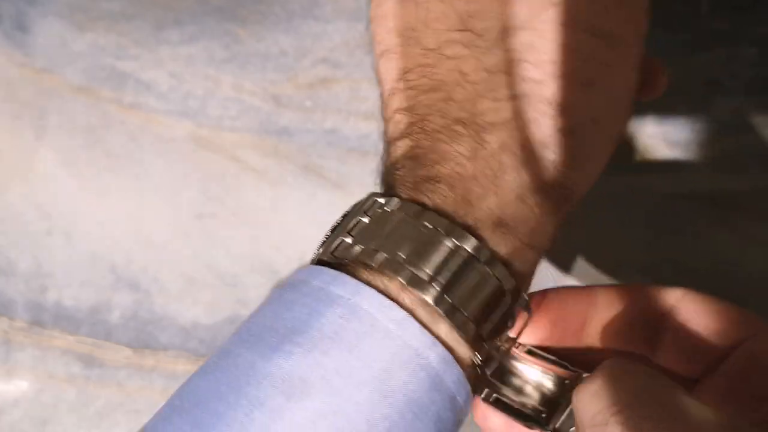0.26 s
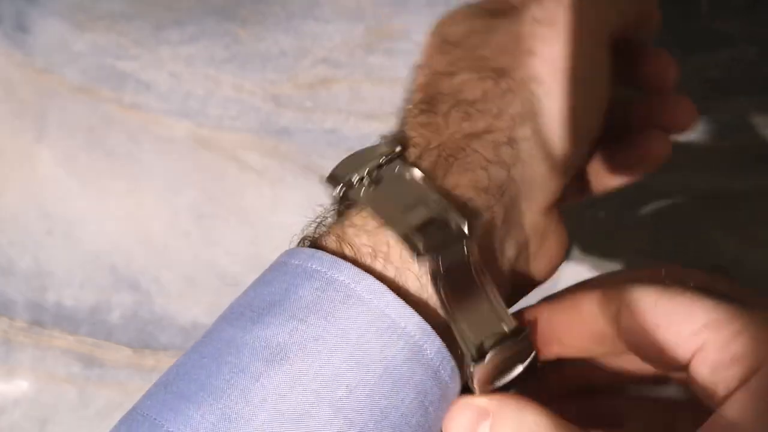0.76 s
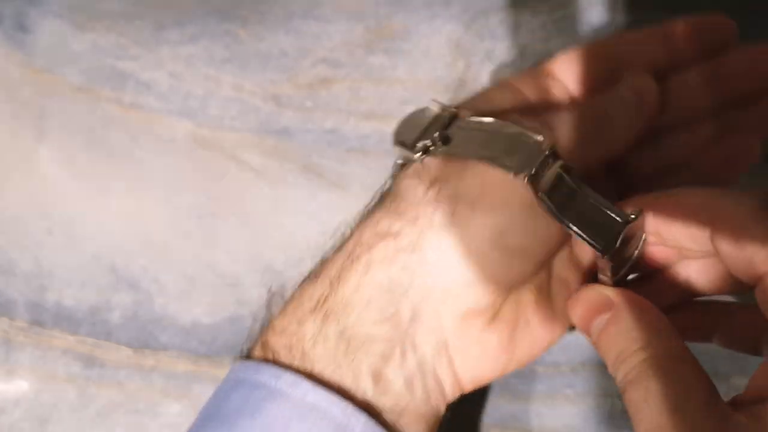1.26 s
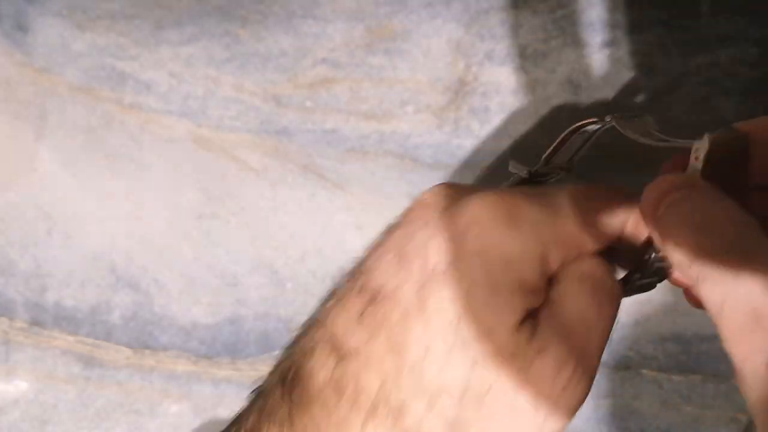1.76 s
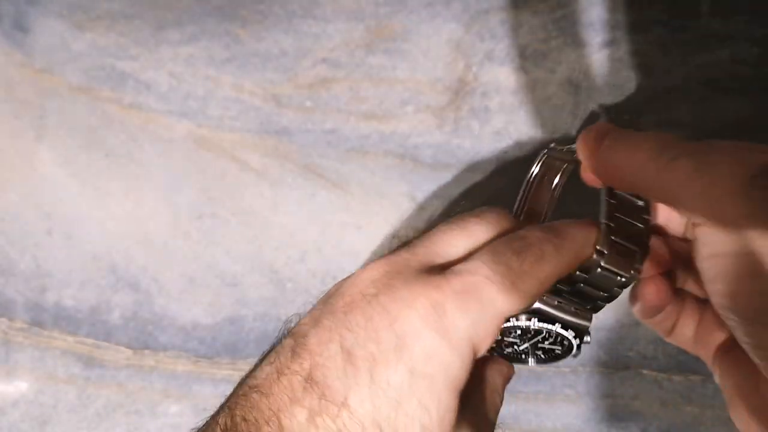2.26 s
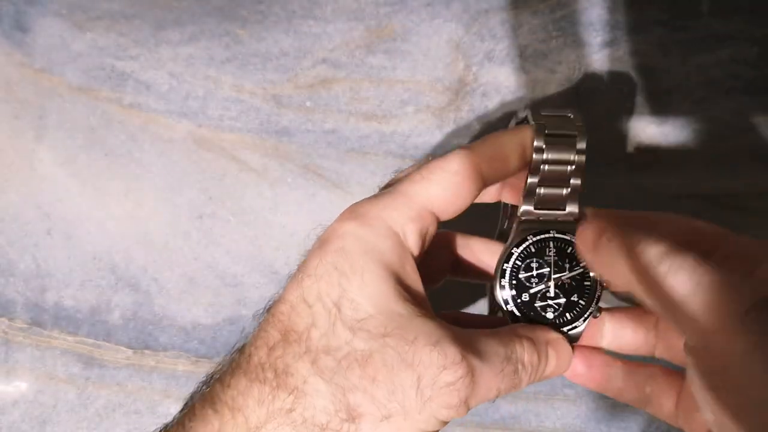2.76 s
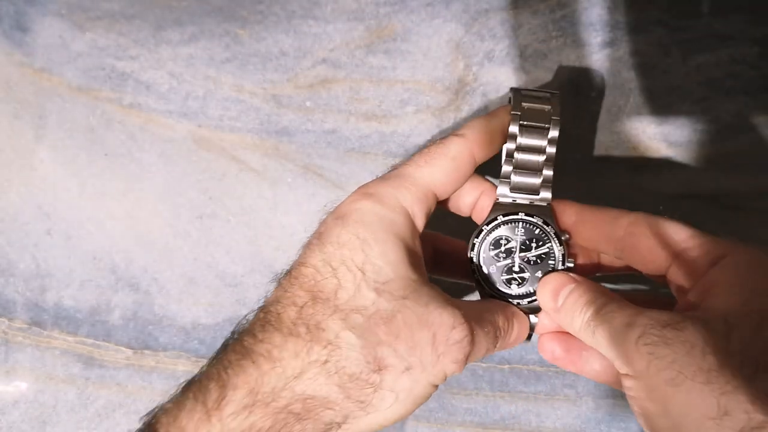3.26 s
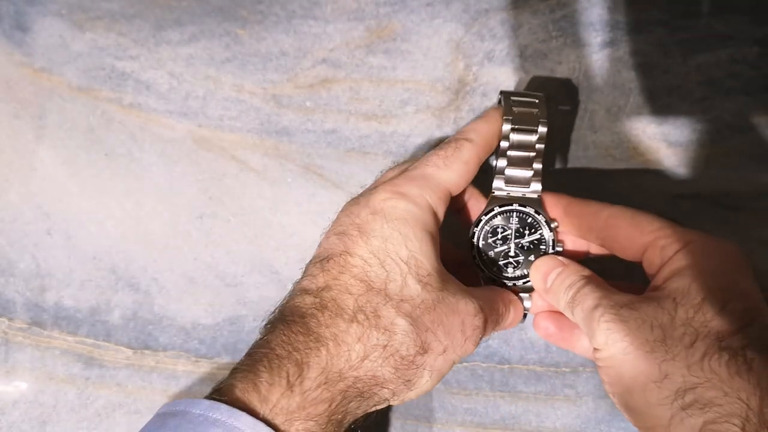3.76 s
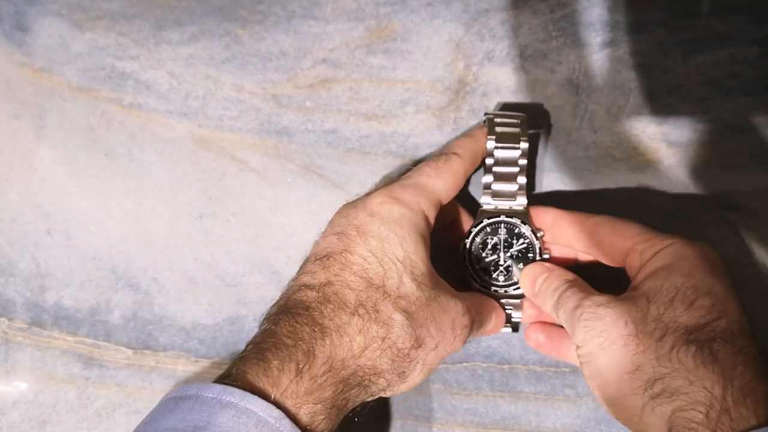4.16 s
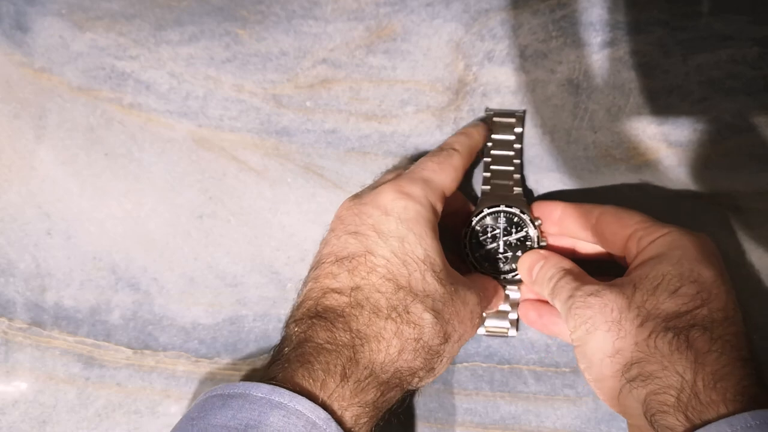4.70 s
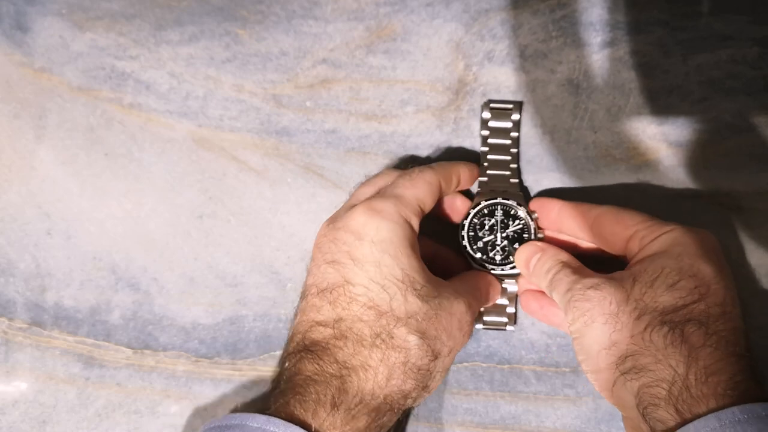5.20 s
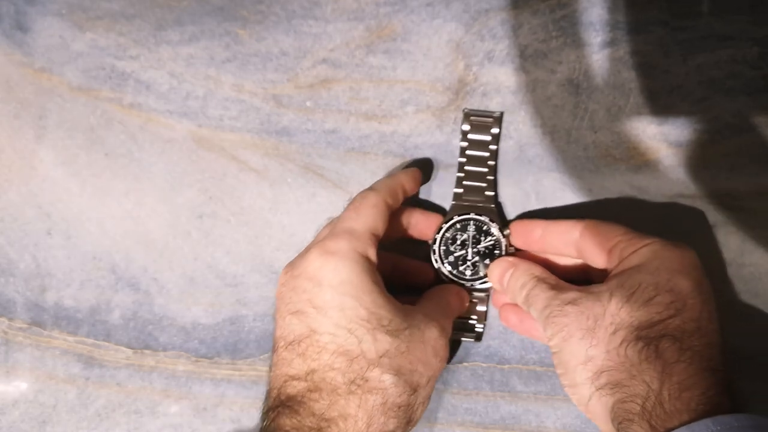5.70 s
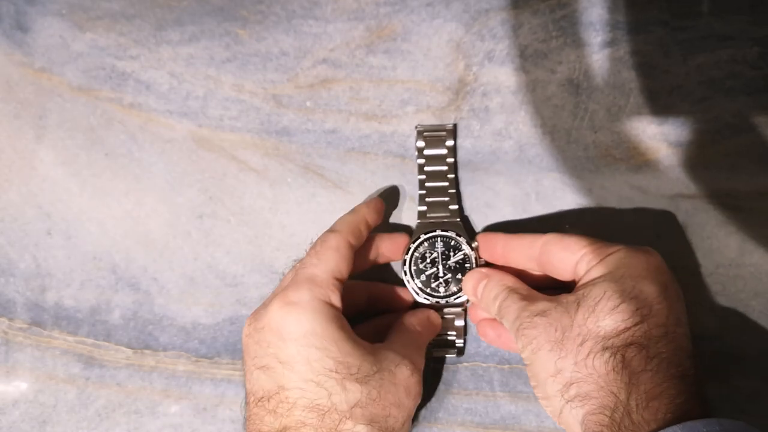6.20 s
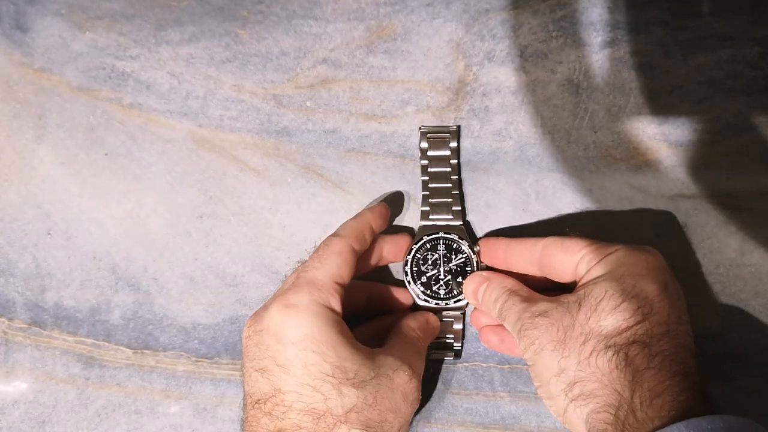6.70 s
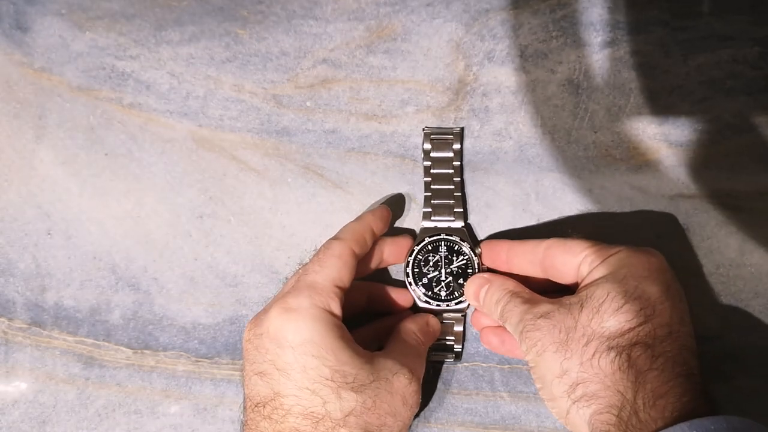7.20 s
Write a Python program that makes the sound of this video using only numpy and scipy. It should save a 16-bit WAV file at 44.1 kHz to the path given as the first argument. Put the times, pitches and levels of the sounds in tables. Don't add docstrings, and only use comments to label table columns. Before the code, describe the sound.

A steel watch bracelet snaps open with a bright click, jingles lightly in the hands, then clacks and scrapes down onto a table.

```python
import sys
import numpy as np
from scipy import signal
from scipy.fft import rfft, irfft
from scipy.io import wavfile
from scipy.ndimage import uniform_filter1d

SR = 44100
rng = np.random.default_rng(int(sys.argv[2]) if len(sys.argv) > 2 else 0)


def unload_wav(signal):
    wavfile.write(
        sys.argv[1],
        SR,
        np.round(np.clip(np.atleast_2d(signal).T, -1, 1) * 32767).astype(np.int16),
    )


def makeup_ratio(level_db):
    decades = np.asarray(level_db, float) / 20
    return 10 ** decades


N = 328545
DECAY = np.log(1000)
SET_DOWN_S = 4.35


def shaped(x, points, gain=makeup_ratio):
    hz, value = np.transpose(points)
    f = np.fft.rfftfreq(x.shape[-1], 1 / SR)
    curve = np.interp(np.log(f + 1), np.log(hz), value)
    return irfft(rfft(x) * gain(curve), x.shape[-1])


def unit(x):
    return x / np.sqrt(np.mean(x ** 2))


def peak(x, db):
    return x * makeup_ratio(db) / np.sqrt(np.max(uniform_filter1d(x ** 2, size=150)))


def add(out, s, sound):
    at = int(s * SR) - 32
    out[at:at + len(sound)] += sound[:N - at]


def ring(modes, scatter_db, size, retune=.015):
    hz, db, t60 = np.transpose(modes)[:, :, None]
    t = np.arange(size) / SR
    chance = rng.standard_normal((2, len(modes), 1))
    tones = np.sin(2 * np.pi * hz * (1 + retune * chance[0]) * t)
    waves = tones * np.exp(-DECAY * t / t60)
    return np.sum(makeup_ratio(db + scatter_db * chance[1]) * waves, axis=0)


def contacts(size, spread_db):
    strength = np.minimum(rng.exponential(size=size), 5)
    return rng.standard_normal(size) * makeup_ratio(spread_db * strength)


# pitch_hz, density_db (per Hz)
HUM_COLOUR = [(8.8, -28), (15, 2.5), (54, -6.5), (76, -12), (219, -26), (315, -24.5), (373, -25),
              (599, -20.5), (749, -26), (1640, -25), (3390, -29), (4230, -34), (5760, -37), (11900, -43.5),
              (15500, -90.5), (22000, -120)]
HUM_DB = -67.5
# pitch_hz, correlation
MIC_LIKENESS = [(60, 1), (130, 0.56), (290, -0.86), (640, -0.79), (1410, 0.2), (3100, -0.21), (6820, 0.6),
                (15000, -0.68)]
# pitch_hz, width_hz, level_db
DRONES = [(60, 9.8, -70), (97.5, 10, -79)]


def hum():
    mid, side = rng.standard_normal((2, N))
    mid = shaped(mid, MIC_LIKENESS, lambda c: np.sqrt(1 + np.clip(c, -1, 1)))
    side = shaped(side, MIC_LIKENESS, lambda c: np.sqrt(1 - np.clip(c, -1, 1)))
    out = unit(shaped(np.array([mid + side, mid - side]), HUM_COLOUR)) * makeup_ratio(HUM_DB)
    for hz, width, db in DRONES:
        resonance = signal.iirpeak(hz, hz / width, fs=SR)
        out = out + makeup_ratio(db) * unit(signal.lfilter(*resonance, rng.standard_normal(N)))
    return out


# pitch_hz, t60_s, level_db
ROOM = [(507, 0.43, -18.5), (1620, 0.28, -16), (3000, 0.2, -16), (6000, 0.27, -20), (10000, .25, -22),
        (13900, 0.17, -12.5)]


def room(x):
    t, tail = np.arange(26460) / SR, 0
    for k, (_, t60, db) in enumerate(ROOM):
        band = [(hz, float(j == k)) for j, (hz, *_) in enumerate(ROOM)]
        noise = unit(shaped(rng.standard_normal((2, len(t))), band, np.sqrt))
        energy = SR * t60 / (2 * DECAY)
        tail = tail + noise * makeup_ratio(db) * np.exp(-DECAY * t / t60) / np.sqrt(energy)
    tail *= np.clip((t - .002) / 0.0025, 0, 1)
    mic_db = [[-5.], [0.]]
    return signal.fftconvolve(x[None], tail * makeup_ratio(mic_db), axes=1)[:, :N]


def clock():
    return np.arange(0, N + 64, 64) / SR


def swell(s, length, db):
    overshoot = 1.1
    shape = np.interp(clock(), [s, s + 0.5 * length, s + length], [0, overshoot, 0])
    return makeup_ratio(db) * np.minimum(shape, 1) ** 0.83


def motion(moves, share_db, side):
    return sum(swell(s, length, db + share_db + side * links_db) for s, length, db, links_db in moves)


# start_s, length_s, rubbing_db, links_over_case_db
HANDLING = [
    (0.0, 0.12, -105, -11),
    (0.58, 0.24, -100, 4),
    (1.07, 0.15, -72.5, 5),
    (1.22, 0.19, -68, 2),
    (1.44, 0.31, -83, 9),
    (1.93, 0.19, -76, 6),
    (2.12, 0.27, -80.5, 4),
    (2.37, .3, -88, 2),
    (3.2, 0.24, -84.5, -2),
]
# start_s, length_s, rubbing_db, links_over_case_db
SLIDING = [
    (4.62, 0.23, -64, 13),
    (4.85, 0.21, -76, -5),
    (5.18, 0.17, -43, 4.5),
    (5.38, 0.15, -64, 2.5),
    (5.8, 0.73, -72, 0.5),
    (6.24, 0.47, -68.5, 4),
    (6.7, 0.55, -95.5, 6.5),
]
# start_s, length_s, level_db
LEANING = [
    (4.3, 0.25, -77.5),
    (4.71, 0.53, -64.5),
    (5.164, 0.17, -52.5),
    (5.33, 0.21, -61.5),
    (5.711, 0.26, -81.5),
    (6.067, 0.17, -61.5),
    (6.249, 0.35, -80.5),
    (6.794, 0.73, -74.5),
]
# pitch_hz, density_db (per Hz)
RUBS = [
    [(4500, -24.5), (6500, -13), (7600, 0.5), (8500, -11), (9600, 0), (11000, -8), (15000, -13.5),
     (16500, -39.5)],
    [(800, -29), (1300, -13.5), (1850, -2.5), (2050, -0.5), (2300, -8), (2550, -2), (3300, -14.5),
     (5000, -36.5)],
    [(2200, -31), (3300, -1.5), (4800, -1), (6000, 1), (8000, -30)],
    [(100, -23), (165, 8), (230, -3), (320, -5.5), (450, -38)],
]
LINKS_SIDE = [1, -1, .5]
IN_HAND = [0, 0, 0]
ON_TABLE = [-13, 0, -11]
HELD = [-85.5, -82, -88, -82.5]
RESTING = [-93.5, -79, -92, -77.5]
# pitch_hz, level_db
TABLE_DULLS = [(10500, 0), (12500, -7)]


def shifting():
    out, t = 0, np.arange(N) / SR
    moves = [motion(HANDLING, hand_db, side) + motion(SLIDING, table_db, side)
             for side, hand_db, table_db in zip(LINKS_SIDE, IN_HAND, ON_TABLE)]
    moves.append(sum(swell(*row) for row in LEANING))
    for colour, moving, held_db, rest_db in zip(RUBS, moves, HELD, RESTING):
        restless = makeup_ratio(np.where(clock() < SET_DOWN_S, held_db, rest_db))
        level = np.interp(t, clock(), moving + restless)
        stutter_db = 2.3 * unit(uniform_filter1d(rng.standard_normal(N), size=600))
        rub = unit(shaped(contacts(size=N, spread_db=3.), colour))
        out = out + rub * level * makeup_ratio(stutter_db)
    return np.where(t < SET_DOWN_S, out, shaped(out, TABLE_DULLS))


# pitch_hz, level_db, t60_s
TABLE = [(65.9, -17, 0.31), (90, -21, 0.4), (146.2, -12, 0.14), (168.45, 5.5, 0.29), (226, -3, 0.09),
         (308.5, -12, 0.14), (421, -21, 0.06), (600, -28.5, 0.046), (881, -22, .05)]
# start_s, peak_db, deep_db, upper_db, stilled_s (by the hand)
THUDS = [(0.606, -56, 4, 5.5, .15), (4.397, -48.5, -2, 6, 0.1), (4.654, -28.5, 1.5, 10.5, 0.099),
         (4.878, -51, -3, 5, 0.074), (4.895, -43, -2, 2, .09), (5.044, -46.5, -4, 2, 0.12),
         (5.139, -46, -3.5, 2.5, 0.11), (5.169, -37.5, 0.5, 1, 0.14), (5.18, -27.5, 0, -6.5, 0.11),
         (5.2, -26, 6.5, -7, 0.097), (5.418, -55.5, -8.5, -14, .1), (6.091, -42, -14, -0.5, .05),
         (6.106, -37.5, -5, 18, 0.063), (6.151, -41.5, 3, 12.5, 0.059)]


def thuds():
    out, t = np.zeros(N), np.arange(16384) / SR
    groups = TABLE[:2], TABLE[3:4], TABLE[2:3] + TABLE[4:]
    for s, db, deep_db, upper_db, stilled in THUDS:
        deep, main, upper = (ring(modes, scatter_db=4.0, size=16384, retune=.005) for modes in groups)
        damping = .15 + .85 * np.exp(-np.maximum(t - stilled, 0) / 0.013)
        top = (makeup_ratio(deep_db) * deep + main + makeup_ratio(upper_db) * upper) * damping
        add(out, s, peak(signal.fftconvolve(np.hanning(60), top), db - 1.5))
    return signal.sosfilt(signal.butter(2, 45, "high", fs=SR, output="sos"), out)


# pitch_hz, level_db, t60_s
LINKS = [(4800, -3, .003), (5850, -5.5, 0.009), (7300, -3.5, 0.0086), (9190, -7, 0.0095),
         (10400, -7.5, .003), (14700, -16, 0.0021)]
# pitch_hz, level_db, t60_s
CASE = [(1090, -11.5, .008), (1210, -12, .008), (1600, -6.5, .008), (1840, -8.5, .008), (2000, 1.5, 0.0095),
        (2520, -4, 0.011), (2710, -7.5, .006), (3160, -13, 0.003)]
# pitch_hz, density_db (per Hz)
CRACK = [(1470, -43), (2500, -11.5), (4800, -14.5), (6230, -2), (7060, -4.5), (8460, -8.5), (9230, 0.5),
         (13600, -9), (15500, -19.5), (16400, -57.5)]


def rattle(db, case_db, t60, top_db, links, tones=CASE):
    t = np.arange(4096) / SR
    rise = np.minimum(t / (.0003 + 0.37 * t60 ** 2), 1)
    fade = np.exp(-DECAY * t / np.clip(t60, .002, .3)) * rise
    snap, chime, tap = (fade * contacts(size=4096, spread_db=2.) for _ in range(3))
    crack = shaped(np.eye(1, 256, 32)[0], CRACK)
    link_ring = np.diff(np.pad(ring(links, scatter_db=0.5, size=225), (32, 0)))
    steel = signal.fftconvolve(snap, crack / crack.max())
    steel = steel + makeup_ratio(-7.0) * signal.fftconvolve(chime, link_ring)
    brightness = [(10300, 0.015), (11800, top_db + 10), (14500, top_db + 16.5), (16500, top_db + 2)]
    steel = shaped(np.pad(steel, (0, 1)), brightness)
    case_ring = np.diff(np.pad(ring(tones, scatter_db=3.0, size=993), (32, 0)))
    case = np.pad(signal.fftconvolve(tap, case_ring), (0, 1))
    case = shaped(case, [(3200, -6.0), (5000, -9.5), (12000, -45.5)])
    out = peak(case, case_db + 2.5)
    out[:len(steel)] += peak(steel, db - 4.5)
    return out


def top_tilt(hz, db_per_oct):
    return db_per_oct * np.log2(hz / 9500)


def hand_clicks(rows, case_db, top_db, ring_db):
    out = np.zeros(N)
    for s, db, hz, t60 in rows:
        harder_db = 0.31 * min(db + 46, 12)
        bright_db = top_db + top_tilt(hz, -0.5) + harder_db
        add(out, s, rattle(db, db + case_db, t60, bright_db, LINKS + [(hz, ring_db, .004)]))
    return out


# start_s, treble_peak_db, link_pitch_hz, t60_s
SWINGS = [(0.2558, -56, 9500, 0.021), (0.4429, -61, 9300, 0.018), (0.4813, -58.5, 9500, .015),
          (0.4953, -39, 9780, 0.033), (1.1598, -42.5, 3700, .06), (1.1714, -38, 9400, 0.13),
          (1.1857, -33, 4350, .046), (1.1944, -37, 5070, 0.023), (1.3374, -59, 9000, .067),
          (1.4596, -50, 9940, 0.021), (1.485, -48.5, 9250, .067), (1.5024, -56, 7300, .029),
          (1.6462, -57.5, 9400, 0.023), (1.722, -62, 5570, .029), (1.9594, -62, 9220, 0.028),
          (1.9894, -48.5, 10000, 0.041), (2.0183, -47.5, 9600, .047), (2.0794, -58, 10400, 0.018),
          (2.1195, -44.5, 3860, 0.014), (2.2258, -43.5, 9400, 0.034), (2.2484, -52, 12000, .035),
          (2.2676, -50, 4620, 0.037), (2.2807, -49, 4800, 0.11), (2.3885, -59, 4640, 0.039),
          (2.215, -52, 3500, .03), (2.523, -61, 4550, 0.019), (2.5544, -68, 9000, .041),
          (3.041, -52.5, 6100, .02)]


def swings():
    return hand_clicks(SWINGS, case_db=-21, top_db=-17, ring_db=8.5)


# start_s, treble_peak_db, link_pitch_hz, t60_s
TICKS = [(0.158, -45, 9300, 0.027), (0.2139, -56.5, 10000, 0.024), (0.2704, -53.5, 9300, 0.027),
         (0.6094, -15.5, 7040, .018), (0.6104, -17.5, 9500, 0.029), (0.8904, -38.5, 10000, 0.059),
         (0.8949, -36, 6360, 0.032), (0.9532, -46, 11500, .029), (1.0809, -55.5, 6960, .055),
         (1.1263, -34.5, 12700, 0.01), (1.2311, -22.5, 9940, 0.024), (2.1186, -36.5, 7850, 0.032),
         (2.4284, -50.5, 11630, 0.026), (2.804, -59, 4710, .037), (2.8294, -55.5, 4980, 0.039),
         (3.2505, -54.5, 4900, 0.1), (3.2794, -55.5, 10800, 0.04), (3.7289, -52, 5400, 0.039),
         (3.9215, -49.5, 12200, 0.048), (4.0796, -48, 7700, 0.025), (6.8214, -69.5, 9740, 0.025)]


def ticks():
    return hand_clicks(TICKS, case_db=-31, top_db=-15, ring_db=8)


def table_top_db(hz):
    return -16 + top_tilt(hz, 13.5)


# start_s, case_db, t60_s, case_pitch_hz
TAPS = [(0.2748, -75, 0.019, 2000), (1.3565, -58.5, .037, 1900), (2.2944, -63, .05, 2360),
        (3.3568, -72, 0.027, 2000), (4.8777, -43.5, 0.06, 2050), (5.0377, -45.5, 0.06, 2050),
        (5.493, -74, .037, 2050), (5.5767, -65, .026, 2068), (6.1278, -47, .06, 2000),
        (6.152, -51, .079, 2000), (6.79, -61, 0.07, 2500), (7.209, -65, 0.043, 1810)]


def taps():
    out = np.zeros(N)
    for s, db, t60, hz in TAPS:
        add(out, s, rattle(db - 11.5, db, t60, table_top_db(5800), LINKS, CASE + [(hz, 8.5, .015)]))
    return out


# start_s, treble_peak_db, link_pitch_hz, t60_s, case_db
KNOCKS = [(4.3949, -37, 7000, 0.069, -43), (4.4009, -52, 5700, 0.028, -41),
          (4.6505, -16.5, 9900, 0.044, -28.5), (4.6659, -29.5, 5500, 0.15, -39.5),
          (4.7397, -40, 4700, 0.046, -42.5), (4.8967, -44, 4800, 0.038, -39),
          (5.0444, -43.5, 5550, 0.07, -46), (5.101, -53, 10000, 0.12, -60),
          (5.138, -40.5, 10400, .11, -45.5), (5.168, -31.5, 9100, 0.086, -40),
          (5.1786, -11, 9000, .02, -22), (5.182, -20.5, 5690, 0.052, -27.5),
          (5.197, -13.5, 7780, 0.033, -28.5), (5.2218, -24.5, 7640, .062, -32),
          (5.3994, -47.5, 6950, 0.053, -57), (5.4146, -47, 9240, 0.048, -50),
          (6.0882, -42, 14000, .015, -53.5), (6.0905, -35, 5720, 0.07, -46), (6.104, -37, 7670, .11, -49.5)]


def knocks():
    out = np.zeros(N)
    for s, db, hz, t60, case_db in KNOCKS:
        add(out, s, rattle(db, case_db, t60, table_top_db(hz), LINKS + [(hz, 4, .004)]))
    return out


# pitch_hz, level_db
SHADE = [(300, 0.5), (700, -7.5), (1300, -7.5), (2400, -13.5), (8000, -17), (15000, -9.5)]


def scene():
    watch = swings() + ticks() + taps() + knocks() + shifting()
    thud = thuds()
    shaded = np.roll(shaped(watch, SHADE) + thud, 26)
    return np.array([shaded, watch + thud]) + room(watch) + hum()


def roll_off(x):
    return signal.sosfilt(signal.butter(12, 16540, fs=SR, output="sos"), x)


# pitch_hz (lower edge), level_db (threshold)
GATES = [(12000, -93), (15300, -84)]


def record(dry):
    ceiling = .55
    rounded = ceiling * np.tanh(dry / ceiling)
    sound = signal.sosfilt(signal.ellip(8, .2, 70, 16000, fs=SR, output="sos"), rounded)
    for hz, db in GATES:
        top = shaped(sound, [(hz - 50, 0), (hz + 50, 1)], np.abs)
        faint = uniform_filter1d(np.mean(top ** 2, axis=0), size=1500) < makeup_ratio(db) ** 2
        sound = sound - top * uniform_filter1d(1. * faint, size=256)
    return roll_off(sound)


dry = scene()
out = record(dry)
unload_wav(out)
```